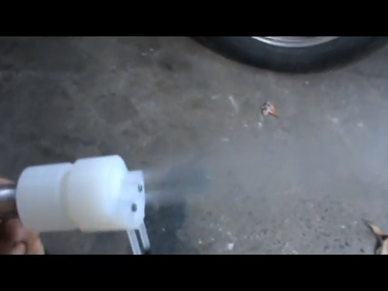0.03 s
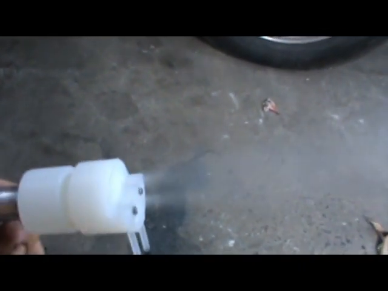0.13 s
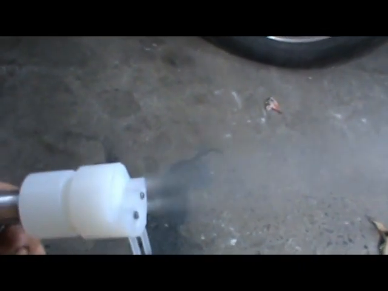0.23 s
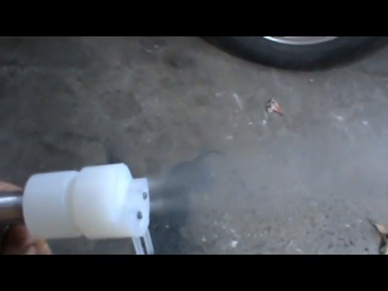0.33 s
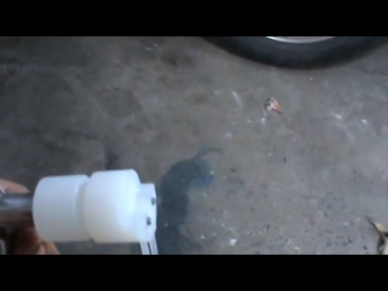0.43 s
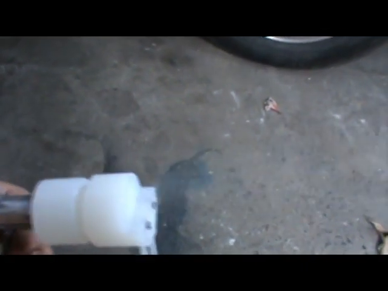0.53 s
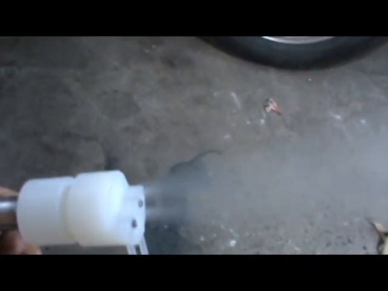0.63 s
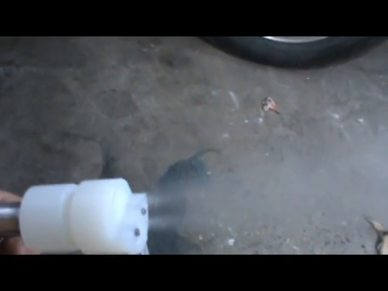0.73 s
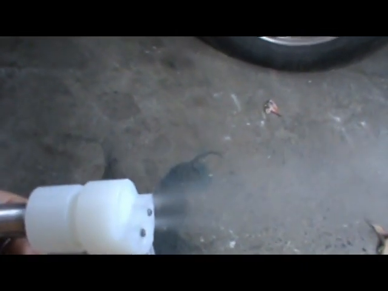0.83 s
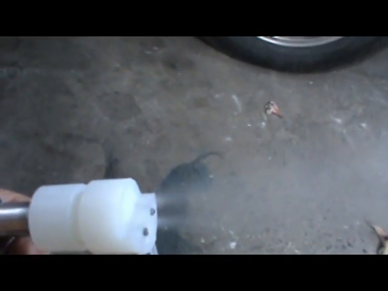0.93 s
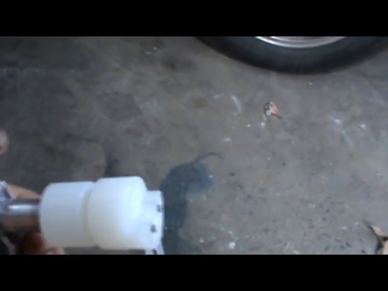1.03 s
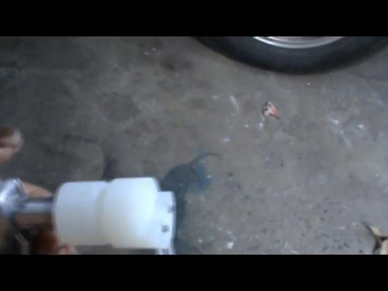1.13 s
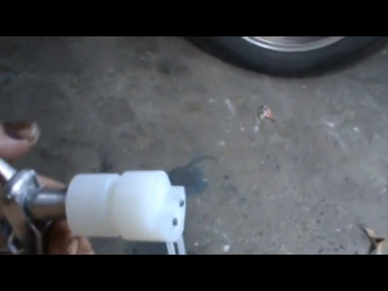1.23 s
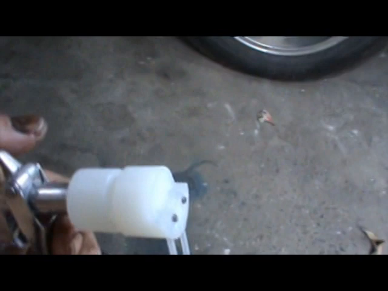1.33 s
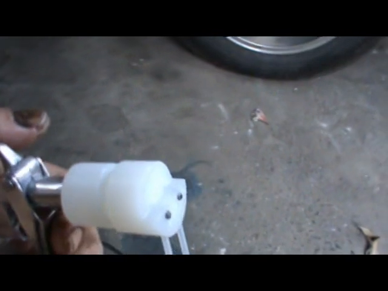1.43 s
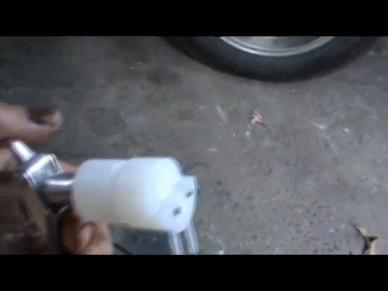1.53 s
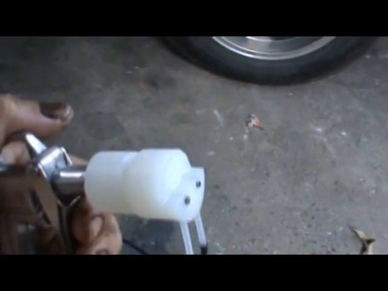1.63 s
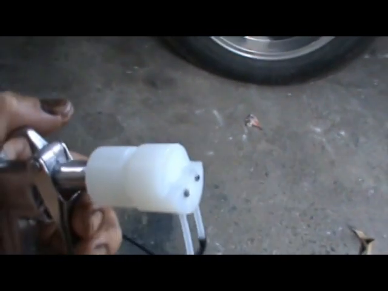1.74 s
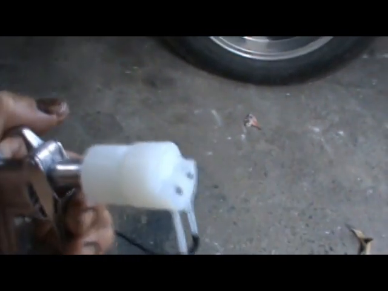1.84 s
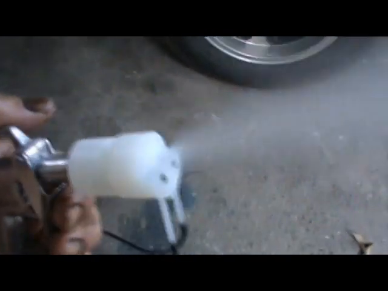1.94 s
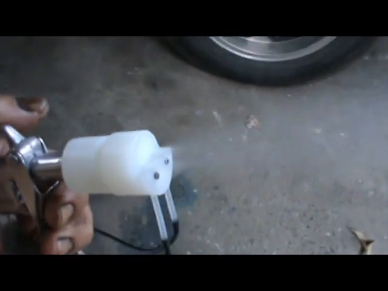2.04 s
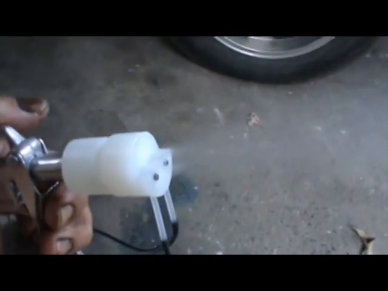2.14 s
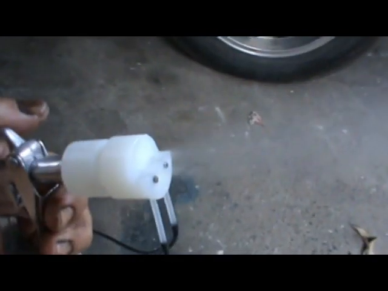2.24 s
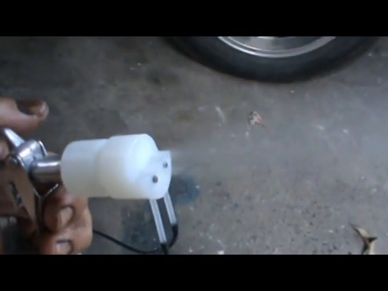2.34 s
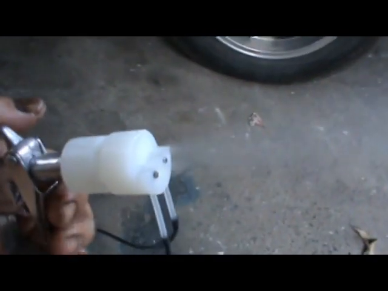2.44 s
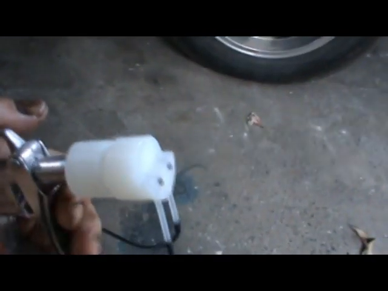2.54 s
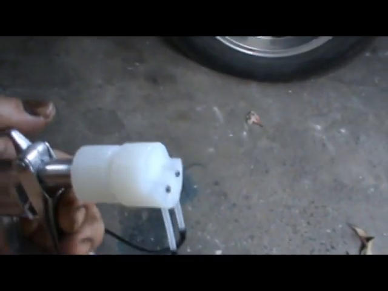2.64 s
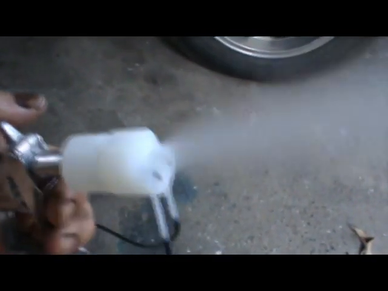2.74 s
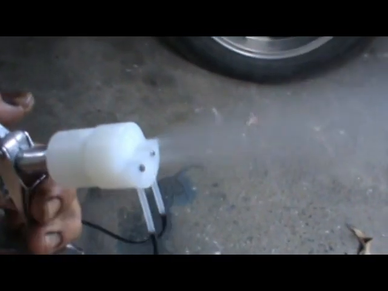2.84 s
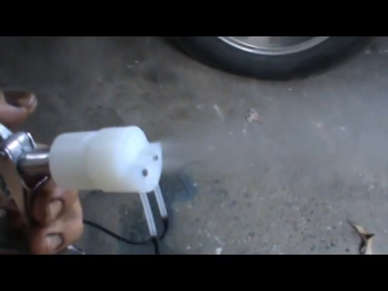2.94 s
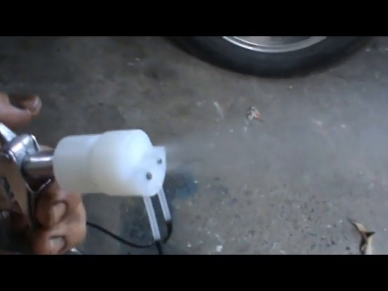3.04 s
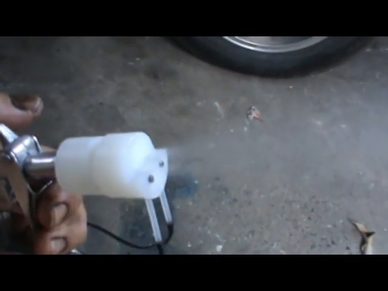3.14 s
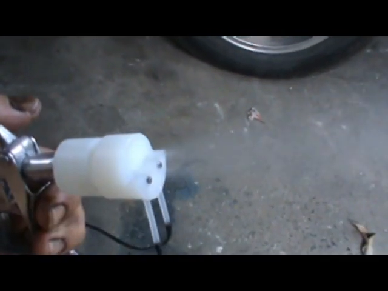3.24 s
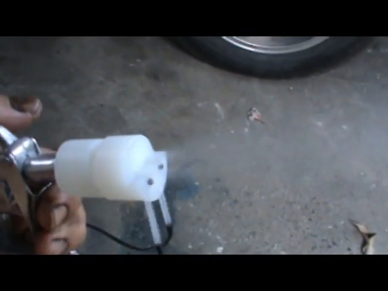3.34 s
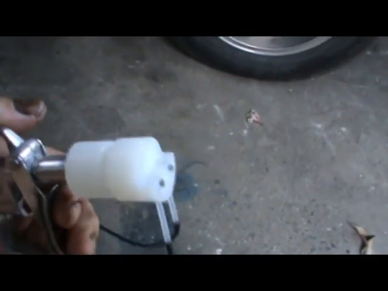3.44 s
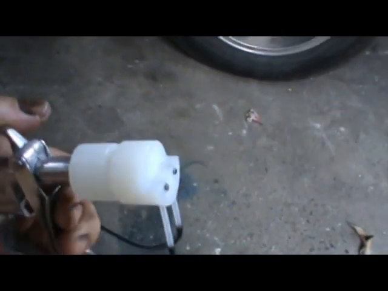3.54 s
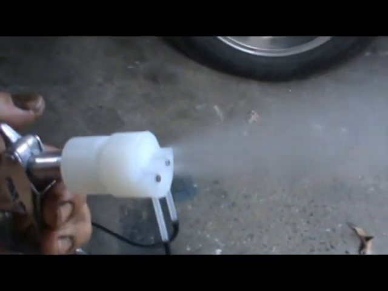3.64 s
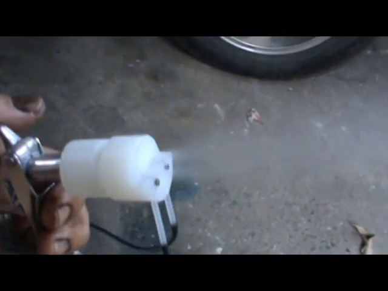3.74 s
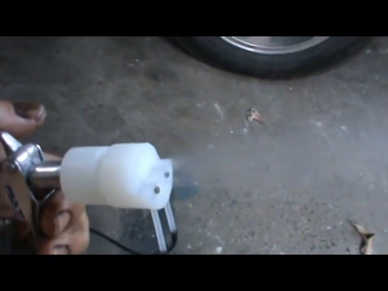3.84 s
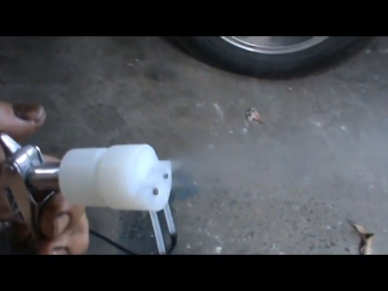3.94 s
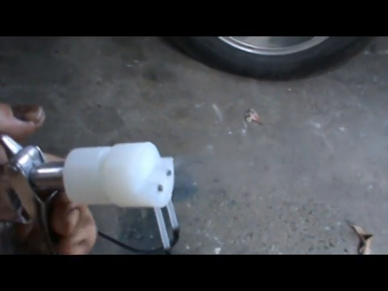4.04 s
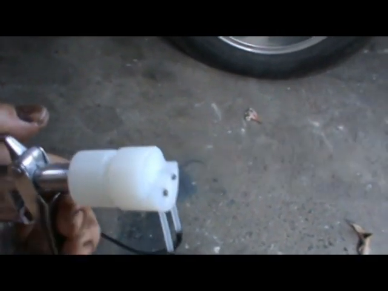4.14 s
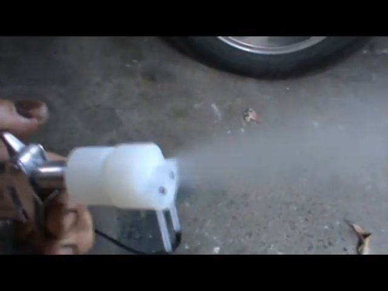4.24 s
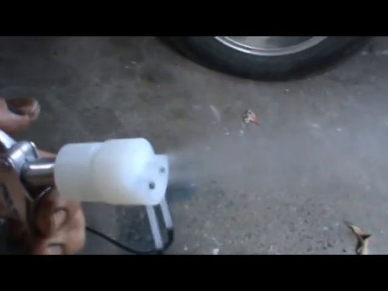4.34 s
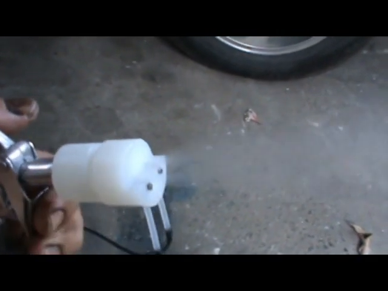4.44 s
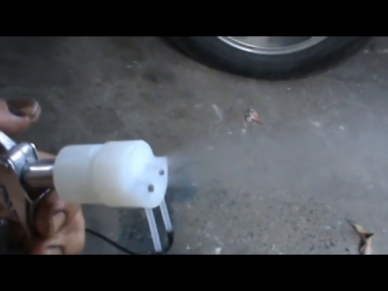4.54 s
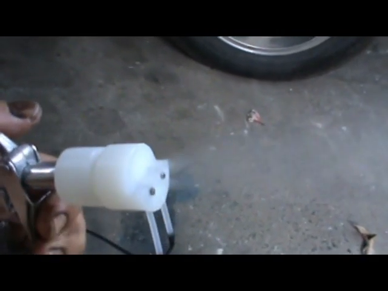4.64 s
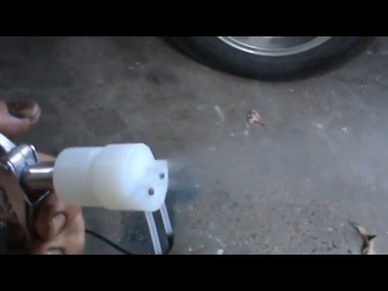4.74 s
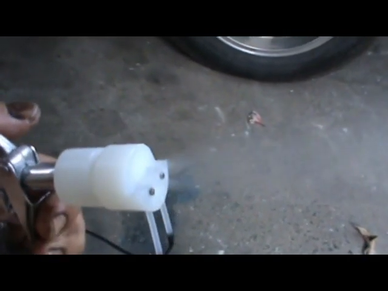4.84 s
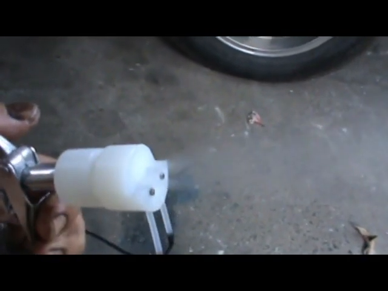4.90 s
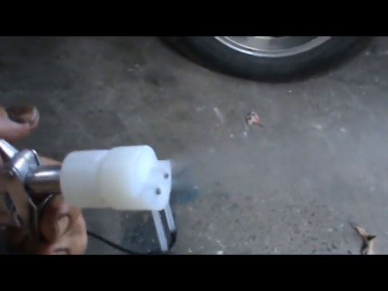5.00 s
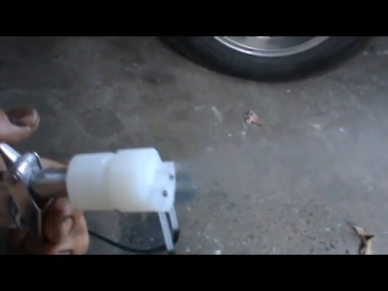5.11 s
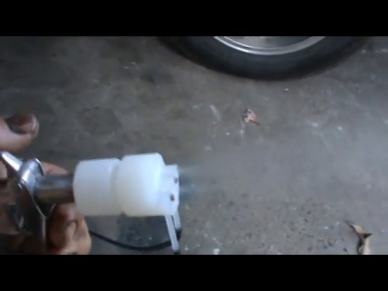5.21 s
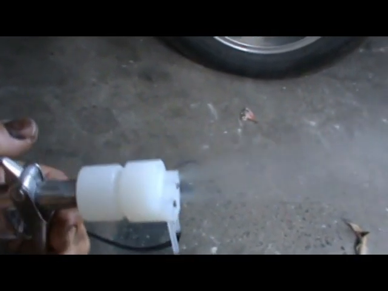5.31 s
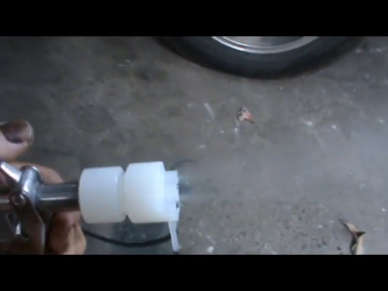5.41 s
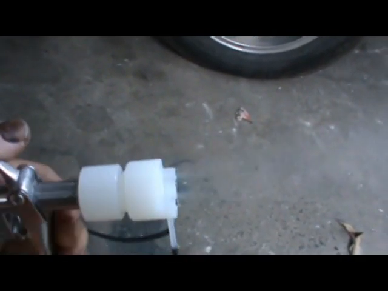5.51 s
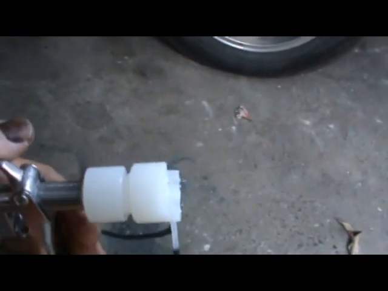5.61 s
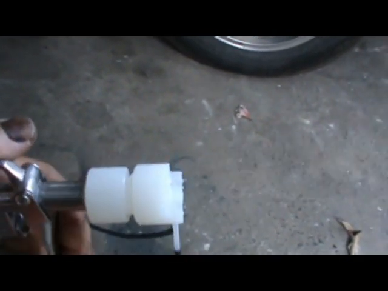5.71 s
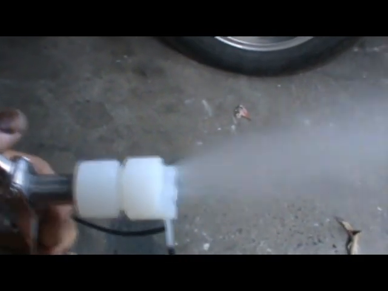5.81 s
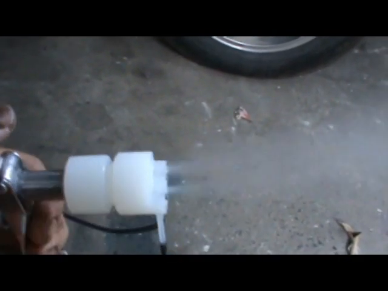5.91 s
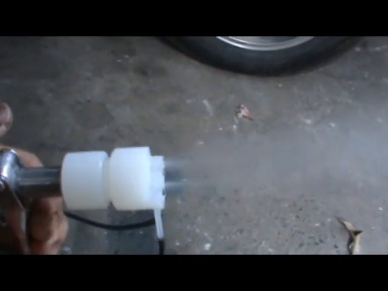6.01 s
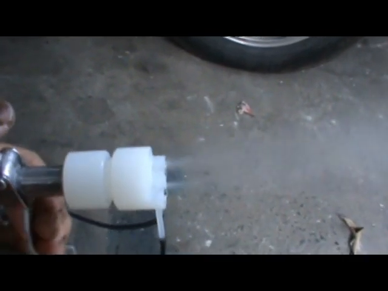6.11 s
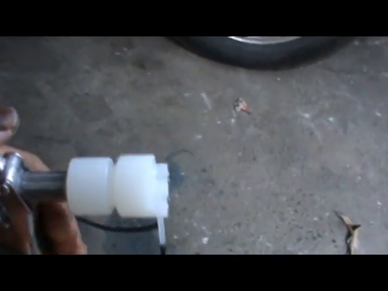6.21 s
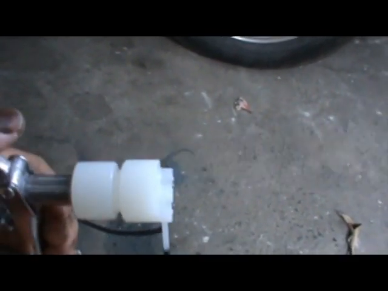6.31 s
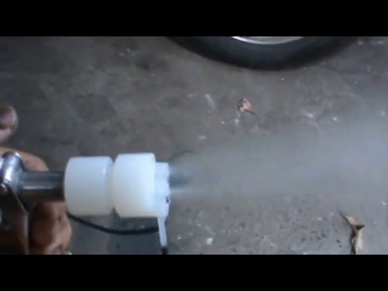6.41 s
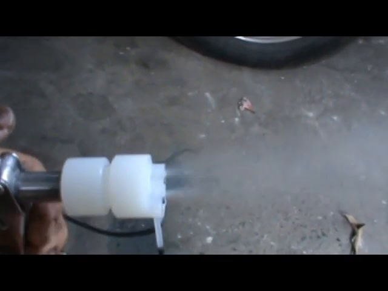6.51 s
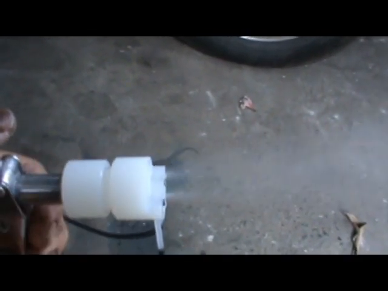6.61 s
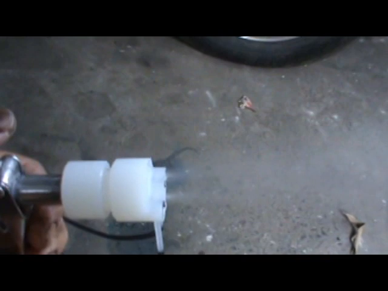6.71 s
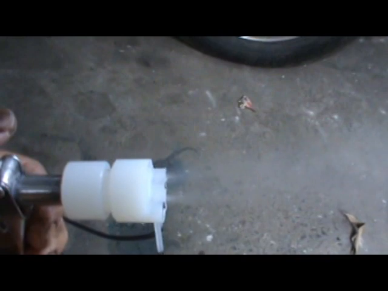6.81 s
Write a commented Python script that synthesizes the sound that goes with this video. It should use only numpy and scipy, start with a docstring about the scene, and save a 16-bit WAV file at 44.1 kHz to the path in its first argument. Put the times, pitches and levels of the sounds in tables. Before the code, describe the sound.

A piston compressor drones steadily in a hard-walled garage. Near the microphone a spray gun hisses, already on at the start, then in separate pulls of half a second to over a second. One pull begins slowly after a thin high leak; the final two are crisp, with the strongest spitting. Automatic levelling pushes the hum down beneath each burst.

```python
"""A piston compressor hums throughout in a garage; close by, an air spray gun is triggered eight times.
The first jet is already on at the start. Each jet is shaped noise that surges with hose pressure, then sags.
A moment after each opening, liquid spits as falling chirps and a splash, then tears into patchy mist.
Ahead of the slow third pull the valve leaks thinly. The walls answer each burst with decaying noise.
While the jet is on, gain control pushes the hum down; part of the cut lingers afterwards."""
import sys
import numpy as np
from scipy import signal
from scipy.fft import rfft, irfft, next_fast_len
from scipy.io import wavfile
from scipy.ndimage import uniform_filter1d, map_coordinates

SR = 44100
rng = np.random.default_rng(int(sys.argv[2]) if len(sys.argv) > 2 else 0)


def transcribe(signal):
    """Save signal, clipped to [-1, 1], as a 16-bit WAV file at the path in sys.argv[1]."""
    frames = np.atleast_2d(signal).T
    limited = np.clip(frames, -1, 1)
    pcm = np.round(limited * 32767).astype(np.int16)
    wavfile.write(sys.argv[1], SR, pcm)


N = 302526
T = np.arange(N) / SR  # time [s]


def amp(db):
    """Decibel law: a level becomes an amplitude ratio."""
    return 10 ** (np.asarray(db) / 20)


def unit(x):
    """Normalisation: the mean square becomes 1."""
    return x / np.sqrt(np.mean(x ** 2) + 1e-20)


def along(points, hz):
    """Logarithmic frequency scale: (frequency [Hz], value) points are interpolated on it."""
    knot_hz, values = np.transpose(points)
    return np.interp(np.log(hz + 1), np.log(knot_hz + 1), values)


def wobble(rate):
    """Slow random modulation: a spline through random knots, rate of them per second."""
    knots = rng.standard_normal(int(N * rate / SR) + 4)
    return map_coordinates(knots, [T * rate])


def filtered(x, response):
    """Linear filtering: the spectrum is multiplied by a complex response of frequency."""
    size = next_fast_len(N + SR // 2)
    spectrum = rfft(x, size) * response(np.fft.rfftfreq(size, 1 / SR))
    return irfft(spectrum, size)[..., :N]


def noise(colour, alike):
    """Partial coherence: mid and side noises are mixed for a given left-right likeness over frequency."""
    def mid_side_gains(hz):
        turn = np.arccos(np.clip(along(alike, hz), -1, 1)) / 2
        return colour(hz) * np.array([np.cos(turn), np.sin(turn)])

    mid, side = filtered(rng.standard_normal((2, N)), mid_side_gains)
    return unit(np.array([mid + side, mid - side]))


def placed(x, pan, lead):
    """Stereo localisation: level and phase differences are split equally between the channels."""
    half = np.array([[.5], [-.5]])
    return filtered(x, lambda hz: amp(half * along(pan, hz)) * np.exp(1j * half * along(lead, hz)))


def swell(start, life):
    """Transient envelope: a quick rise to 1 at life seconds after start, then a decay."""
    age = np.maximum(T - start, 0) / life
    return age * np.exp(1 - age)


def ringing_phase(levels_db, size=128):
    """Minimum phase: the log spectrum's cepstrum is folded so a stroke strikes first and rings afterwards."""
    orders = np.arange(len(levels_db)) + 1.5
    log_gain = np.interp(np.arange(size // 2 + 1), orders, np.log(amp(levels_db)))
    causal_cepstrum = 2 * irfft(log_gain)[:size // 2]
    return np.imag(rfft(causal_cepstrum, size))[1:]


# harmonics of the compressor stroke: (multiple of the stroke rate, relative level [dB])
STROKE_ORDERS = [(1, -13), (2, -9.5), (3, -18.5), (4, -15.5), (5, -7.5), (6, -8), (7, 1.5), (8, -10.5),
                 (9, -17.5), (10, -9.5), (11, -18.5), (12, -14.5), (13, -14.5), (14, -15.5), (15, -9),
                 (16, -21.5), (17, -31), (18, -14.5), (19, -9.5), (20, -8.5), (21, -8.5), (22, -38),
                 (23, -10), (24, -22.5)]
# resonances of the pump housing: (centre [Hz], width [Hz], relative level [dB])
HOUSING_MODES = [(708, 65, -1), (842, 140, -1), (1291, 44, -0.5), (1545, 67, -3), (3030, 320, -5.5),
                 (7400, 200, -12.5), (8300, 200, -17)]
# steady rush of compressor air: (frequency [Hz], relative level per hertz [dB])
RUSH_SPECTRUM = [(25, -7), (62, -15), (112, 5), (150, -2.5), (280, -0.5), (500, -2.5), (1000, 0.5),
                 (2000, -3), (3100, -3.5), (5000, -7.5), (7500, -13.5), (10500, -16), (13400, -20),
                 (14500, -58)]
# faint steady tones under the strokes: (frequency [Hz], relative rms level [dB])
DRONE_TONES = [(100, -62), (236, -60)]
# compressor level difference: (frequency [Hz], left minus right [dB])
PUMP_LEVEL_DIFFERENCE = [(43, -3), (86, 3), (150, -3.5), (260, 2), (430, 0.5), (560, 7), (640, -1),
                         (860, 9.5), (1250, 4.5), (1900, 5.5), (3800, 0.5), (12000, 0.5)]
# compressor phase difference: (frequency [Hz], lead of the left [rad])
PUMP_PHASE_LEAD = [(43, .2), (86, 0.24), (150, 0.65), (400, 1.12), (520, 1.28), (850, 1), (1250, 0.65),
                   (1800, 0), (12000, 0.45)]
# left-right likeness of compressor noise: (frequency [Hz], correlation [0-1])
PUMP_LIKENESS = [(100, 0.92), (400, 1), (1000, 0.41), (1500, 0.52), (2500, 0.79), (12000, 0.85)]


def compressor(hum_db=-34, chuff_db=-42.4, rush_db=-39.4, waver=0.11, chuff_lag=0.24):
    """Periodic excitation: each stroke rings the tank and chuffs through the housing, over rushing air."""
    stroke_hz, slowing_hz, slows_at_s = 43.2, .145, 2.85
    speed = stroke_hz - slowing_hz * (T > slows_at_s)
    turns = np.cumsum(speed * (1 + .001 * wobble(5))) / SR

    hum = np.zeros(N)
    phases = ringing_phase([db for _, db in STROKE_ORDERS])
    for (order, db), phase in zip(STROKE_ORDERS, phases):
        # the walls scatter the phases, most of all for weak orders; higher orders arrive later: a soft throb
        smear = rng.normal(0, .05 * abs(db)) - .032 * order * order
        level = amp(db) * (1 + waver * wobble(12))
        hum += level * np.cos(2 * np.pi * order * turns + phase + smear)

    def housing(hz):
        total = 0
        for k, (centre, width, db) in enumerate(HOUSING_MODES):
            damping = 1j * hz * width
            # neighbouring modes have opposite signs
            total = total + (-1) ** k * amp(db) * damping / (centre * centre - hz * hz + damping)
        return total

    puffs = unit(np.exp(.55 * np.cos(2 * np.pi * (turns - chuff_lag))))  # one a stroke
    chuff = puffs * noise(housing, PUMP_LIKENESS)
    rush = noise(lambda hz: amp(along(RUSH_SPECTRUM, hz)), PUMP_LIKENESS)
    drone = sum(amp(db) * unit(np.sin(2 * np.pi * hz * T)) for hz, db in DRONE_TONES)
    mix = amp(hum_db) * unit(hum) + amp(chuff_db) * chuff + amp(rush_db) * rush + drone
    return placed(mix, PUMP_LEVEL_DIFFERENCE, PUMP_PHASE_LEAD)


# reverberation of the bare garage: (frequency [Hz], time to decay by 60 dB [s])
GARAGE_DECAY = [(200, .4), (3000, 0.64), (12000, 0.32)]


def garage(x, spread=0.13):
    """Reverberation: convolution with decaying noise; the treble dies first."""
    hz, t, grains = signal.stft(rng.standard_normal((2, SR // 2)), SR, nperseg=256)
    decay = amp(-60 * t / along(GARAGE_DECAY, hz)[:, None])
    mid, side = signal.istft(grains * decay, SR, nperseg=256)[1]
    tail = np.array([mid + spread * side, mid - spread * side])
    return signal.fftconvolve(x, tail / np.linalg.norm(tail[0]), axes=1)[:, :N]


def valve(start, stop, opening, closing=0.014):
    """Orifice flow control: opening of the air valve, 0-1, squared on the way up and linear on the way down."""
    return np.clip((T - start) / opening, 0, 1) ** 2 * np.clip((stop - T) / closing + .5, 0, 1)


def leak(centre_hz=9100, width_hz=1300, skirt_db=-16, level_db=-43):
    """Narrow-gap turbulence: air whistles thinly past the valve seat as the trigger is squeezed slowly."""
    start_s, stop_s, rise_s = 1.685, 1.89, .045

    def band(hz):
        peak = 1 / (1 + (2 * (hz - centre_hz) / width_hz) ** 4)
        return peak + amp(skirt_db + along(JET_SPECTRUM, hz))

    return amp(level_db) * valve(start_s, stop_s, rise_s) * noise(band, JET_LIKENESS)


# falling resonances of a spit, before random detuning:
# (start [Hz], end [Hz], delay [s], life [s], relative level [dB])
SPIT_CHIRPS = [(2900, 2200, .001, .007, -6.5), (4700, 3800, .021, .012, -8.5)]
# first slug of liquid bursting: (frequency [Hz], relative level per hertz [dB])
SPLASH_SPECTRUM = [(1000, -26), (1600, -10), (1950, -1), (2800, -6), (4200, 6), (5500, -4), (8000, -3),
                   (14000, -23)]


def spits(width_hz=1400, glide_s=.02, splash_s=0.023, scatter=.05):
    """Gliding resonance: the first slug of liquid leaves with a splash and two breathy, falling chirps."""
    out = np.zeros((2, N))
    splash = noise(lambda hz: amp(along(SPLASH_SPECTRUM, hz)), JET_LIKENESS)
    roughness = [unit(wobble(width_hz) + 1j * wobble(width_hz)) for _ in SPIT_CHIRPS]
    for *_, arrives, db in TRIGGER_PULLS:
        out += amp(db) * swell(arrives, splash_s) * splash
        for (high, low, delay, life, level), rough in zip(SPIT_CHIRPS, roughness):
            detune = np.exp(rng.normal(0, scatter))  # each chirp's pitch varies slightly at random
            fall = np.exp(-np.maximum(T - arrives - delay, 0) / glide_s)
            hz = (low + (high - low) * fall) / detune
            chirp = np.real(rough * np.exp(2j * np.pi * np.cumsum(hz) / SR))
            out += amp(db + level) * swell(arrives + delay, life) * chirp
    return out


def patchy(x, depth_db, size=256):
    """Random spectral modulation: emphases about 1 kHz by 15 ms, as drops of different sizes break up."""
    grains = signal.stft(x, nperseg=size)[2]
    field = uniform_filter1d(rng.standard_normal(grains.shape[1:]), size=6, axis=0)
    field = uniform_filter1d(field, size=5, axis=1)
    return unit(signal.istft(grains * amp(depth_db * unit(field)), nperseg=size)[1][:, :N])


# trigger pulls, for jet and spits:
# (open [s], shut [s], opening time [s], liquid reaches the nozzle [s], relative spit level [dB])
TRIGGER_PULLS = [(-0.05, 0.435, .012, 0.004, -35), (0.569, 1.116, 0.012, 0.615, -39),
                 (1.812, 2.561, 0.11, 1.992, -36.5), (2.725, 3.477, 0.036, 2.778, -43),
                 (3.613, 4.139, 0.023, 3.674, -38), (4.248, 5.58, 0.016, 4.300, -42),
                 (5.802, 6.214, 0.011, 5.871, -31.5), (6.374, 6.95, 0.0082, 6.425, -32.5)]
# turbulence of the air jet: (frequency [Hz], relative level per hertz [dB])
JET_SPECTRUM = [(150, -35), (600, -19.5), (1500, -14), (2500, -13), (4000, -9), (6200, -4), (8200, -5),
                (8900, -1), (10000, -1.5), (11500, 1), (12600, -2), (14000, -2.5), (15000, -17.5)]
# liquid tearing into mist: (frequency [Hz], relative level per hertz [dB])
MIST_SPECTRUM = [(900, -30), (1600, -7.5), (1950, 0.5), (2700, -1.5), (4300, 3), (7000, -6.5), (14000, -17)]
# left-right likeness of noise at the gun: (frequency [Hz], correlation [0-1])
JET_LIKENESS = [(1000, .7), (2200, .995), (4500, .98), (7000, .84), (10500, .88), (12000, .99)]


def spray(build_s=0.025, sag_s=0.13, wet_surge=0.73, wet_s=0.039, flutter_db=-0.84, gulp_db=0.8):
    """Jet turbulence: flow surges with stored hose pressure, then sags; liquid tears unevenly into mist."""
    jet_db, mist_db = -22.7, -13.7  # jet at working pressure; mist relative to the jet
    surge_db, refill_s = 12.5, .31  # scale of the hose-charge surge; time constant of recharging
    first_rest_s = .4  # charging time before the first pull
    air, liquid = np.zeros(N), np.zeros(N)
    last_stop = TRIGGER_PULLS[0][0] - first_rest_s
    for start, stop, opening, arrives, _ in TRIGGER_PULLS:
        charge = 1 - np.exp(-(start - last_stop) / refill_s)  # more after a longer rest
        age = np.maximum(T - start, 0)
        pressure = charge * (1 - np.exp(-age / build_s)) * np.exp(-age / sag_s)
        flow = valve(start, stop, opening) * amp(jet_db + surge_db * pressure)
        air += flow
        wetness = np.clip((T - arrives) / 0.009, 0, 1) + wet_surge * swell(arrives, wet_s)
        liquid += flow * amp(mist_db) * wetness
        last_stop = stop
    flutter = amp(flutter_db * wobble(120))
    jet = air * flutter * noise(lambda hz: amp(along(JET_SPECTRUM, hz)), JET_LIKENESS)
    tearing = unit(amp(gulp_db * wobble(18)))
    droplets = noise(lambda hz: amp(along(MIST_SPECTRUM, hz)), JET_LIKENESS)
    return jet + liquid * tearing * patchy(droplets, depth_db=3)


# gun level difference: (frequency [Hz], left minus right [dB])
GUN_LEVEL_DIFFERENCE = [(400, 14), (800, 9), (1400, 1.5), (2400, -2), (6000, 0.3), (7000, 1), (8400, 5),
                        (11000, 2.5), (11800, 0.5), (15000, -1)]
# gun phase difference: (frequency [Hz], lead of the left [rad])
GUN_PHASE_LEAD = [(1200, 0.86), (2400, -0.43), (5000, 0.079), (7300, 0.28), (8200, 0.57), (9300, -0.22),
                  (12000, 0)]


def scene():
    """Superposition: the gun close by, its echo, and the compressor further off."""
    gun = placed(spray() + spits() + leak(), GUN_LEVEL_DIFFERENCE, GUN_PHASE_LEAD)
    return gun + amp(-15.5) * garage(gun) + compressor()


def record(dry, drive_db=1.3, ceiling_db=-25.4, window_s=0.012, knee=5, recovery_s=.45, lingering=.45):
    """Dynamic compression: level is clamped at once, part of the cut lingers, and the band is limited."""
    top_hz = 15200
    x = amp(drive_db) * dry
    power = uniform_filter1d(np.mean(x ** 2, axis=0), max(int(window_s * SR), 1))
    excess = np.sqrt(np.abs(power)) / amp(ceiling_db)
    fast = (1 + excess ** knee) ** (-1 / knee)
    step = 1 / (recovery_s * SR)
    # the slow gain starts from the mean gain
    slow = fast.mean() + signal.lfilter([step], [1, step - 1], fast - fast.mean())
    return filtered(x * np.minimum(fast, slow ** lingering), lambda hz: hz < top_hz)


dry = scene()
out = record(dry)
transcribe(out)
```